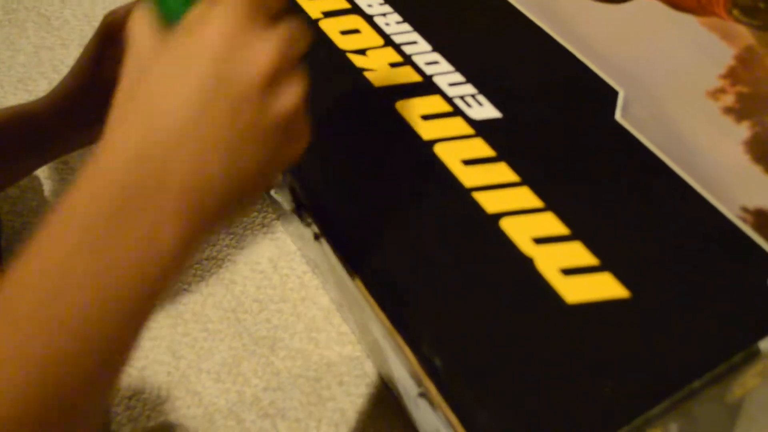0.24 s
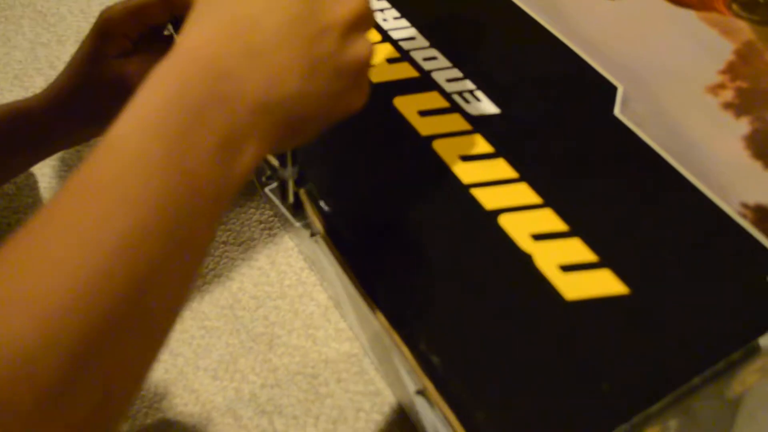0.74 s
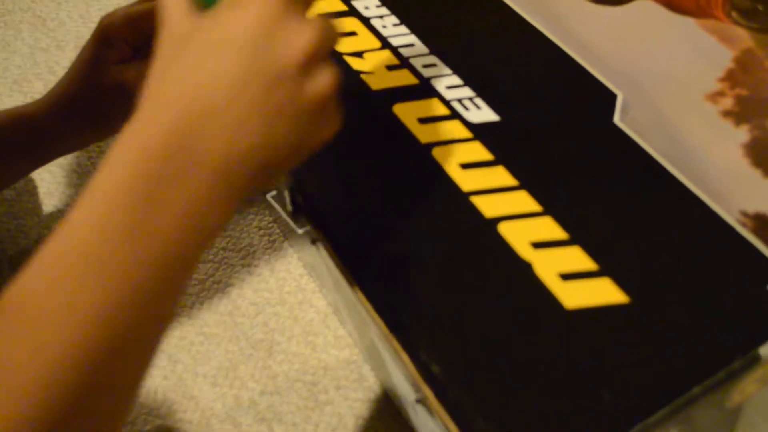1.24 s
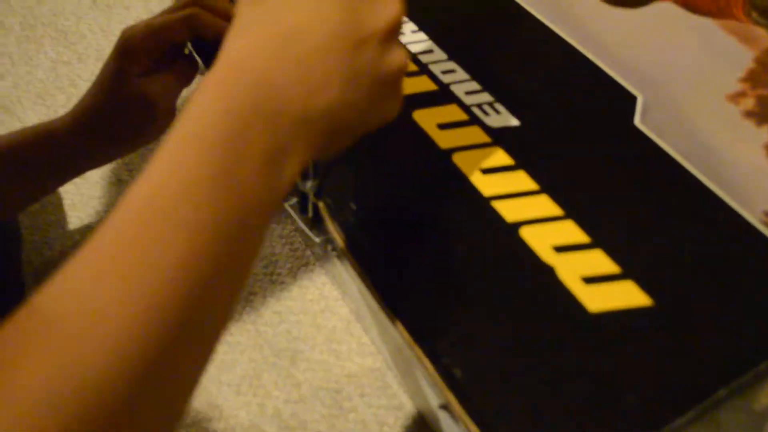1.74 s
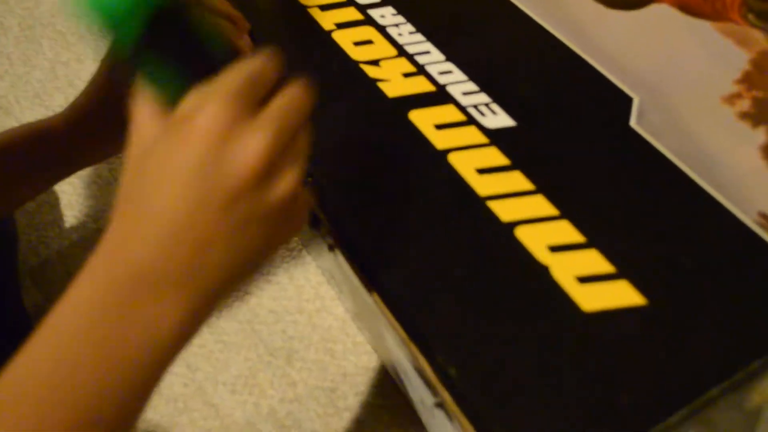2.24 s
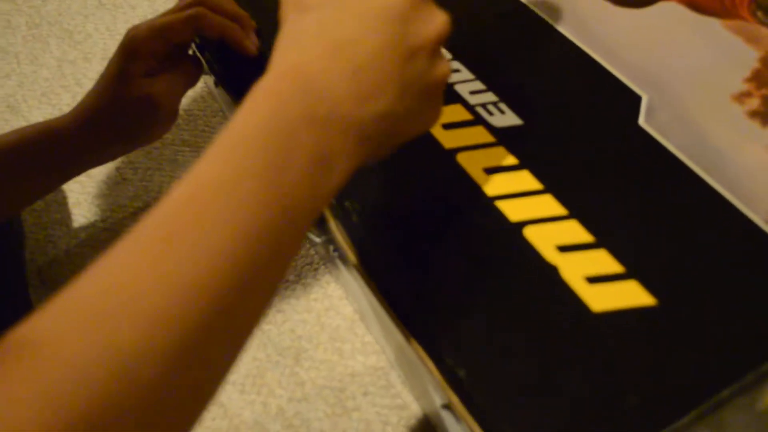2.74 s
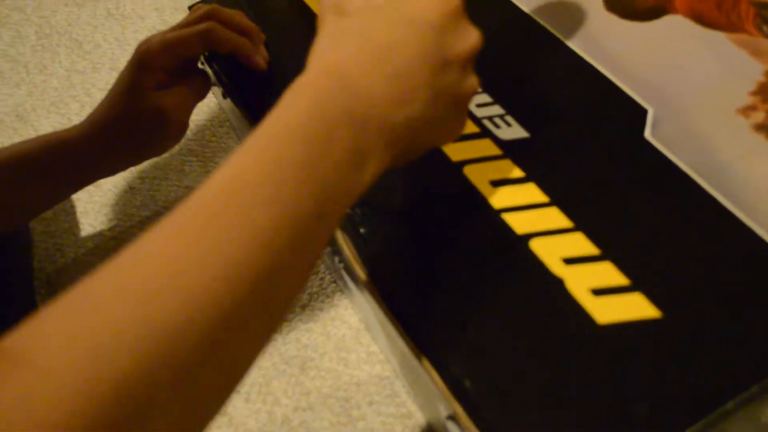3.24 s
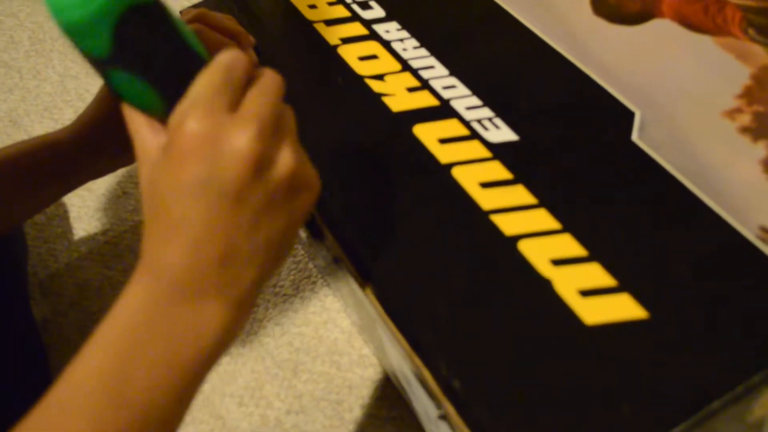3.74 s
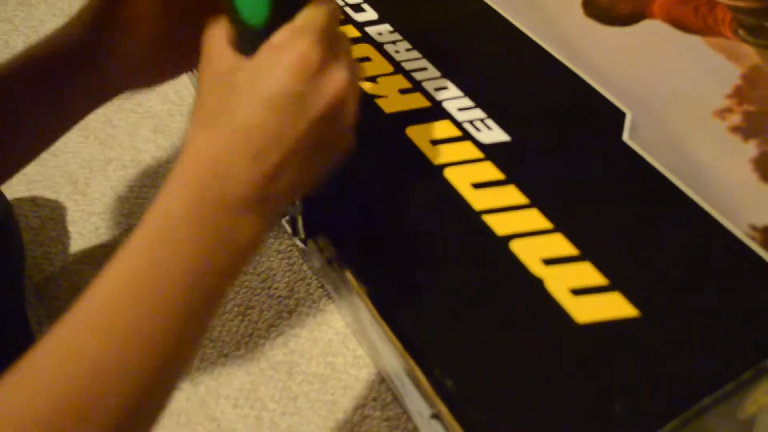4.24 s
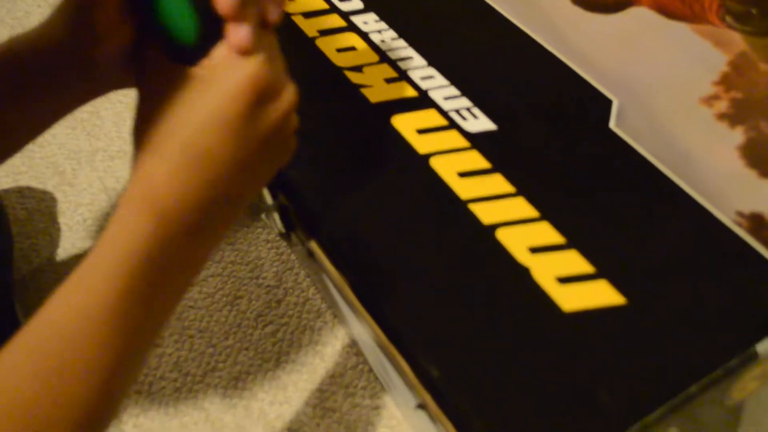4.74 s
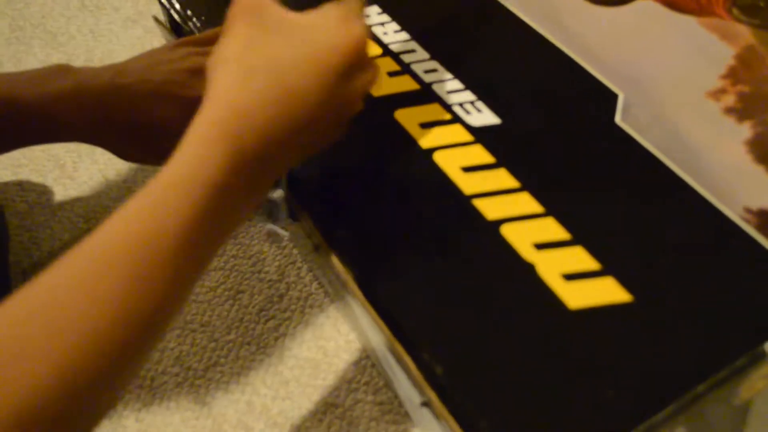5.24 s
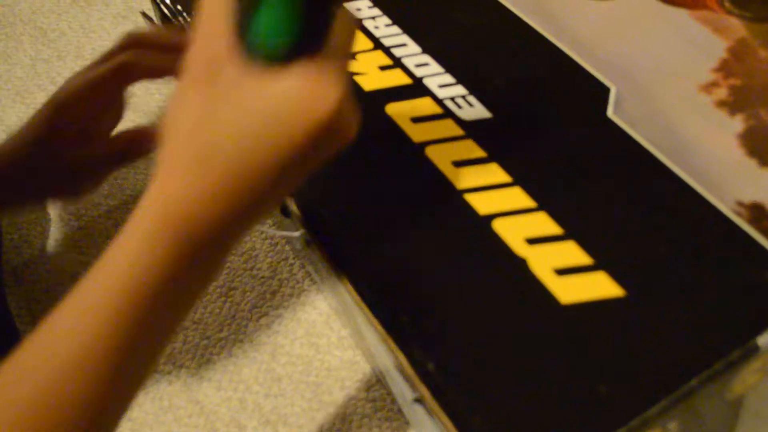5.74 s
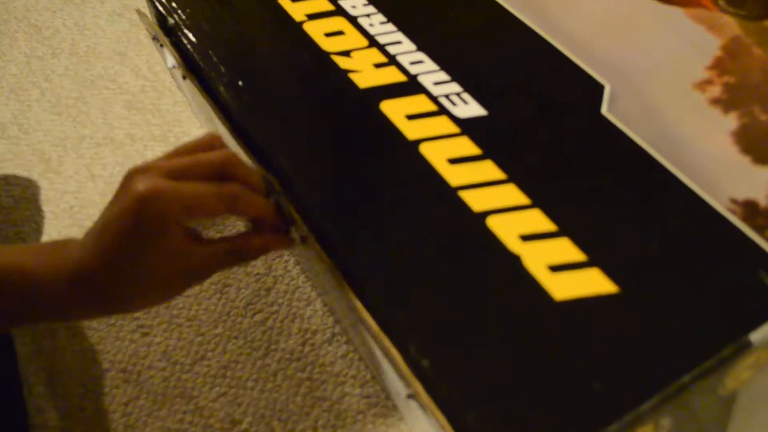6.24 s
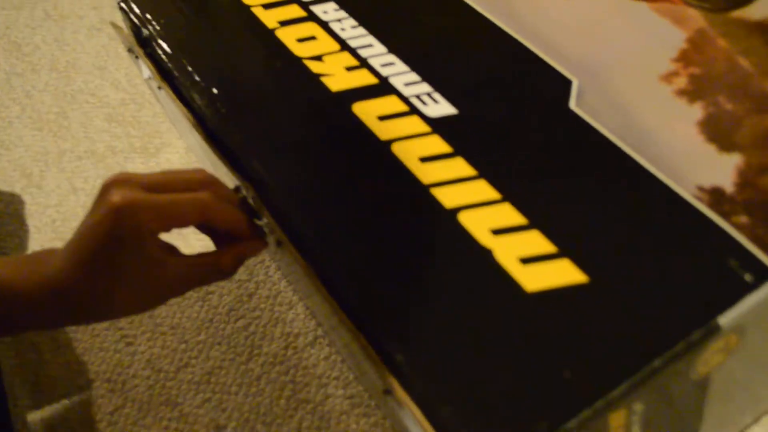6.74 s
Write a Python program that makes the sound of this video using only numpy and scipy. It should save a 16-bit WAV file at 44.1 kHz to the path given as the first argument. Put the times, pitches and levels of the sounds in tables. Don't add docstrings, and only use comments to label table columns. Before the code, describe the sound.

A screwdriver works at metal staples in a hollow cardboard box, faint scrapes and knocks building to a loud pop and a bright metallic snap.

```python
import sys
import numpy as np
from scipy import signal
from scipy.fft import rfft, irfft, next_fast_len
from scipy.io import wavfile
from scipy.ndimage import uniform_filter1d

SR = 44100
rng = np.random.default_rng(int(sys.argv[2]) if len(sys.argv) > 2 else 0)


def output_pcm(signal):
    pcm = np.clip(np.atleast_2d(signal).T, -1, 1) * 32767
    wavfile.write(sys.argv[1], SR, np.round(pcm).astype(np.int16))


def volts_from_decibels(level):
    exponent = np.asarray(level, float) / 20
    return 10 ** exponent


N = 307818

# start_s, wall_peak_db, panel_db (re wall), wall_ring_factor, loudest_wall_hz
FIRM_KNOCKS = [(0.3191, -29, 1, 1.8, 1150), (0.457, -40, -2, 1.1, 1340), (1.1106, -45, -3, 1, 1460),
               (1.6776, -37, -14, 1.8, 840), (1.934, -40, 1.5, 1.1, 1180), (1.9598, -33, 5, 1.4, 1090),
               (1.9848, -37.5, 9, 3.2, 1230), (2.1758, -39.5, 0.5, 1.1, 1310), (2.2207, -39.5, 8, 2.7, 933),
               (3.4653, -42.5, 8, 2.2, 700), (3.5679, -39, 6.5, 1.3, 1090), (3.827, -33.5, 0.5, 2.2, 1450),
               (3.9068, -42.5, 0.5, 1.4, 1160), (5.0496, -39, 7, 2.4, 800), (5.064, -32, 9.5, 1.1, 900),
               (5.075, -26.5, 5, 0.75, 900), (5.268, -41, -16.5, 1.1, 939), (5.2757, -30, -6, 1, 1044),
               (5.2965, -25, -6, 1.1, 1280), (5.6219, -30.5, 2, 1.7, 1800), (5.6286, -30.5, 3.5, 1.2, 2000),
               (6.6156, -41, -6.5, 1.5, 1030), (6.94, -33, 2, 1.2, 1280)]
# pitch_hz, level_db, t60_s
PANEL_MODES = [(159.4, -5, 0.1), (185.8, -6, 0.17), (204, 0.5, 0.14), (251.4, -2, 0.081), (273.4, 5, 0.073),
               (335, 4.5, 0.055), (410, -4.5, 0.13), (504, -9.5, 0.052)]
# pitch_hz, level_db, t60_s
WALL_MODES = [(537, 0, 0.049), (634, -2, 0.04), (751, -6, 0.046), (849, -9, 0.071), (891, 3.5, 0.018),
              (1041, -5, 0.053), (1160, -1.5, 0.022), (1336, -2, 0.023), (1550, 2, 0.017),
              (1730, -5, 0.033), (1855, -7, 0.031), (1965, -9, 0.043), (2198, -9.5, 0.026)]
# pitch_hz, level_db, t60_s
BLADE_MODES = [(2900, -2, 0.0017), (3200, -7, 0.0077), (3700, -9.5, 0.0057), (4000, -18.5, 0.005)]
# frequency_hz, level_db (per Hz)
BOARD_HISS = [(2500, 10.5), (3300, 5.5), (5000, -0.5), (6500, -4), (8500, -4), (11000, -9), (14000, -19),
              (16000, -24)]


def rms_one(x):
    return x / np.sqrt(np.mean(x ** 2) + 1e-20)


def coloured(x, spectrum):
    hz, db = np.transpose(spectrum)
    bins_hz = np.maximum(np.arange(N // 2 + 1) * SR / N, 1)
    gain = volts_from_decibels(np.interp(np.log(bins_hz), np.log(hz), db))
    return rms_one(irfft(rfft(x) * gain, N))


def top_cut(x, hz):
    return signal.sosfilt(signal.cheby2(12, 60, hz, fs=SR, output="sos"), x)


def bass_cut(x, order, hz):
    return signal.sosfilt(signal.butter(order, hz, "high", fs=SR, output="sos"), x)


def band_burst(shape, low_hz, high_hz):
    band = signal.butter(2, [low_hz, high_hz], "band", fs=SR, output="sos")
    burst = signal.sosfilt(band, rng.standard_normal(len(shape)) * shape)
    return burst / np.max(np.abs(burst))


def add(out, s, sound):
    at = max(round(s * SR), 0)
    out[at:at + len(sound)] += sound[:N - at]


def grit(per_s, spread_db, size):
    sizes = volts_from_decibels(spread_db * np.minimum(rng.exponential(1, size), 4)) * rng.choice([-1, 1], size)
    return sizes * (rng.random(size) < per_s / SR) + 1e-9


def near(modes, centre_hz, fall_db):
    return [(hz, db - fall_db * abs(np.log2(hz / centre_hz)), t60) for hz, db, t60 in modes]


def ring(force, envelope, modes):
    out = 0
    for k, (hz, db, t60) in enumerate(modes):
        r, w = volts_from_decibels(-60 / (t60 * SR)), 2 * np.pi * hz / SR
        resonance = [0, np.sin(w)], [1, -2 * r * np.cos(w), r * r]
        both = signal.lfilter(*resonance, [force, force * envelope])
        out = out + (-1) ** k * volts_from_decibels(db) * both
    steady, shaped = out
    return shaped / np.sqrt(np.mean(steady ** 2))


def struck(modes, stretch, spread_db, size, signs=(-1, 1)):
    hz, db, t60 = np.transpose(modes)[:, :, None]
    t = np.arange(size) / SR
    strength = volts_from_decibels(db + spread_db * rng.standard_normal(hz.shape)) * rng.choice(signs, hz.shape)
    decay = volts_from_decibels(-60 * t / (t60 * stretch))
    out = np.sum(strength * np.sin(2 * np.pi * hz * t) * decay, axis=0)
    return out / np.max(np.abs(out))


def hush():
    # frequency_hz, level_db (per Hz)
    hush_spectrum = [(19, -30), (45, -11), (213, -13.5), (700, -10.5), (1560, -14.5), (2980, -23),
                     (5680, -36), (16000, -40.5)]
    return volts_from_decibels(-65.5) * coloured(rng.standard_normal(N), hush_spectrum)


def room(x):
    t60_s, wall_cut_hz = 0.26, 2750
    size = next_fast_len(N + SR)
    angle = -2j * np.pi * np.arange(size // 2 + 1) / size
    dull = np.exp(-2 * np.pi * wall_cut_hz / SR)
    absorption = (1 - dull) / (1 - dull * np.exp(angle))
    echo = 0
    for k, lag in enumerate((rng.uniform(0.0055, 0.04, 10) * SR).astype(int)):
        loop = volts_from_decibels(-60 * lag / SR / t60_s) * absorption * np.exp(angle * lag)
        echo = echo + (-1) ** k * loop / (1 - loop)
    return irfft(rfft(x, size) * echo, size)[:N]


def boom():
    # peak_s (the hold begins), level_db, hold_s
    pushes = [(0.0, -80, 0.0035), (0.29, -61, 0.068), (0.607, -61.5, 0.027), (0.933, -65.5, 0.028),
              (1.3, -61, 0.017), (2.004, -56, 0.0089), (2.227, -52.5, .01), (2.384, -59, 0.035),
              (3.493, -59, 0.082), (3.848, -48.5, 0.0092), (4.05, -55, 0.015), (4.19, -61, 0.018),
              (4.31, -63, 0.035), (4.605, -63, 0.031), (4.887, -62.5, 0.077), (5.086, -46.5, 0.0044),
              (5.272, -39, 0.035), (5.66, -53, 0.028), (6.53, -69.5, 0.043), (6.757, -73, 0.081),
              (6.945, -66, .03)]
    pitch_hz, wander_hz = 108, 3.01
    rise_db_per_s, fall_db_per_s = 336, 233
    t, level = np.arange(N) / SR, 0
    for s, db, hold in pushes:
        before_db = rise_db_per_s * np.maximum(s - t, 0)
        after_db = fall_db_per_s * np.maximum(t - s - hold, 0)
        level = level + volts_from_decibels(db - before_db - after_db)
    flex = uniform_filter1d(rng.standard_normal(N), size=4000)
    flex = rms_one(uniform_filter1d(flex, size=4000))
    phase = 2 * np.pi * np.cumsum(pitch_hz + wander_hz * flex) / SR
    return level * np.sqrt(2) * np.sin(phase)


def rubbing():
    # time_s, pressure_db (re a resting hand)
    hand_pressure = [(0.0, -2), (0.31, -10), (0.43, 9), (0.66, -4), (1.44, -2.5), (2.1, 6.5), (2.74, -13.5),
                     (3.42, -9), (3.62, -4), (4.39, 11.5), (4.86, -1.5), (5.23, 13), (5.33, 10), (5.89, -2),
                     (6.57, 7), (6.98, 0)]
    press_db = np.interp(np.arange(N) / SR, *np.transpose(hand_pressure))
    rumble = ring(grit(450, 6.8, size=N), volts_from_decibels(-69.5 + press_db), PANEL_MODES)
    rasp = ring(grit(1150, 3.1, size=N), volts_from_decibels(-70.5 + 0.61 * press_db), WALL_MODES)
    rustle = volts_from_decibels(-73 + 0.23 * press_db) * coloured(grit(7000, 3.0, size=N), BOARD_HISS)
    return rumble + rasp + rustle


def brushes():
    # start_s, length_s, level_db
    finger_strokes = [(0.56, .07, -79), (2.96, .07, -82), (3.729, .06, -80), (3.99, .06, -76),
                      (4.108, 0.087, -73.5), (4.27, .07, -79), (4.85, .04, -79), (4.885, .06, -75),
                      (5.058, 0.046, -72), (5.596, 0.021, -64), (6.268, 0.068, -73.5)]
    # frequency_hz, level_db (per Hz)
    gloss_spectrum = [(3000, -23), (6000, -3), (8500, -2.5), (12000, -3), (15000, -10), (16500, -16)]
    swell = np.zeros(N)
    for s, length, db in finger_strokes:
        add(swell, s, volts_from_decibels(db) * np.sqrt(np.hanning(round(length * SR))))
    return swell * coloured(grit(5200, 4.4, size=N), gloss_spectrum)


def puffs():
    # start_s, peak_db, length_s
    lid_jumps = [
        (5.072, -44, .01),
        (5.0655, -32, 0.0024),
        (5.244, -20.5, 0.0031),
    ]
    out = np.zeros(N)
    for s, db, length in lid_jumps:
        add(out, s, volts_from_decibels(db) * np.hanning(round(length * SR)))
    return out


def short_rings():
    # start_s, length_s, level_db, pitch_hz
    rough_notes = [(0.26, 0.039, -55, 1530), (2.227, .045, -80, 4600), (3.5, .05, -72, 2200),
                   (3.97, 0.075, -74, 3250), (5.207, .042, -64, 3500), (5.222, 0.027, -58, 2000),
                   (5.249, 0.014, -31, 820), (3.734, 0.045, -70, 1500), (4.1, 0.027, -58, 1030),
                   (3.7, 0.044, -71, 1900), (3.407, 0.031, -47.5, 1050), (5.672, 0.014, -54, 6700),
                   (0.253, 0.027, -62, 1440), (0.272, 0.023, -61, 1700), (1.885, 0.037, -60.5, 1900),
                   (1.8, 0.027, -55, 800), (1.282, 0.032, -62, 170), (3.98, 0.053, -56, 300),
                   (3.9, .04, -68.5, 2320), (5.63, .03, -58, 1950), (6.43, 0.039, -61, 330)]
    out = np.zeros(N)
    for s, length, db, hz in rough_notes:
        swell = np.sin(np.pi * np.clip(np.arange(SR // 10) / SR / length, 0, 1))
        add(out, s, volts_from_decibels(db) * ring(grit(2500, 2.8, size=len(swell)), swell, [(hz, 0, .009)]))
    return out


def hums():
    # start_s, length_s, level_db, pitch_hz
    lone_hums = [(0.264, .045, -51, 1610), (0.275, .02, -50, 1820), (0.255, .02, -56, 1370),
                 (0.26, 0.042, -54, 373), (0.33, .04, -46, 204), (0.45, .035, -54, 205),
                 (0.447, 0.053, -58, 368), (1.21, 0.036, -62, 171), (1.499, 0.048, -67, 310),
                 (1.603, 0.11, -63.5, 320), (3.74, 0.033, -64, 1620), (3.835, .045, -66, 2380),
                 (3.839, 0.042, -51, 190), (3.972, 0.063, -68, 3150), (3.97, .03, -67, 1950),
                 (3.972, .05, -50, 995), (3.97, .085, -44, 215), (4.021, .04, -55, 720),
                 (5.256, .027, -33, 925), (5.252, .014, -38, 1560), (3.975, .055, -47, 550),
                 (3.97, .045, -49, 730), (5.262, 0.032, -34, 166), (5.285, 0.016, -34, 420),
                 (5.296, 0.021, -35, 200), (5.304, .03, -40, 335), (5.319, .04, -44, 187),
                 (5.587, .028, -70, 9200), (5.636, .03, -66, 8800), (5.67, .02, -58, 9500),
                 (6.448, 0.057, -60, 260)]
    evenness = .8
    out, t = np.zeros(N), np.arange(6144) / SR
    for s, length, db, hz in lone_hums:
        t60_s = np.clip(40.0 / hz, .004, .05)
        mode = [(hz, 0, t60_s)]
        note = ring(grit(2500, 2.5, size=2 * len(t)), 1, mode)
        note = note / (np.abs(signal.hilbert(note)) + .2) ** evenness
        note = note[len(t):]
        swell = np.sqrt(np.abs(np.sin(np.pi * np.clip(t / length, 0, 1)))) * (t < length)
        add(out, s, volts_from_decibels(db) * ring(note, swell, mode))
    return out


def thuds():
    # start_s, peak_db, pitch_hz, t60_s
    panel_thuds = [
        (1.2815, -47, 190, .07),
        (1.11, -51, 680, 0.044),
        (1.6785, -45, 346, .05),
        (1.679, -50, 840, .06),
        (5.2457, -12, 1450, .009),
        (3.8275, -46, 600, .04),
        (0.58, -56, 620, .04),
        (5.6285, -30, 264, 0.035),
        (6.1466, -53, 290, .05),
    ]
    out, t = np.zeros(N), np.arange(6144) / SR
    for s, db, hz, t60 in panel_thuds:
        add(out, s, volts_from_decibels(db - 60 * t / min(t60, .09)) * np.sin(2 * np.pi * hz * t))
    return out


def flicks():
    # start_s, peak_db, centre_hz
    wire_flicks = [(5.7805, -56, 6500), (5.7905, -49.5, 6000), (5.802, -62, 5500), (5.705, -55, 7700),
                   (5.6, -58, 9500), (3.8285, -51, 10000), (4.024, -60, 4100), (5.6735, -46, 9500),
                   (5.2445, -26, 2400), (5.2445, -34, 4600), (5.297, -38, 2100), (5.318, -44, 1500),
                   (5.644, -46, 8500), (3.8285, -48, 4100), (5.6205, -28, 9000)]
    out, t = np.zeros(N), np.arange(6144) / SR
    for s, db, hz in wire_flicks:
        add(out, s, volts_from_decibels(db) * band_burst(t * np.exp(-t / 0.00073), hz / 1.33, hz * 1.23))
    return out


def nicks():
    # start_s, peak_db, centre_hz
    card_nicks = [(0.319, -53.5, 3300), (1.0495, -53, 3200), (1.9594, -54, 4400), (3.0283, -57, 2500),
                  (3.5673, -57, 4200), (3.828, -44, 2200), (3.8292, -50, 4200), (3.9075, -63, 4400),
                  (4.3545, -53, 2400), (4.8309, -60, 2800), (4.9916, -56, 3000), (5.0617, -44, 2300),
                  (5.0622, -55, 5400), (5.066, -36, 2700), (5.0755, -31.5, 1600), (5.0757, -44, 3100),
                  (5.084, -42, 1600), (5.2662, -35, 2300), (5.267, -36, 4700), (5.2766, -28, 2200),
                  (5.2766, -36, 4500), (5.288, -35.5, 2200), (5.2965, -41, 4900), (5.301, -52, 7600),
                  (5.644, -37, 1900), (5.6725, -44, 6500), (5.682, -42, 3300), (5.419, -61, 2800),
                  (5.6216, -37, 12000), (5.6217, -26.5, 3300), (5.2453, -19, 1440), (3.8287, -49, 3600),
                  (1.1084, -59, 3000), (5.5735, -50, 1700), (6.8165, -52.5, 5500), (5.058, -39, 705),
                  (0.27, -52, 1700), (3.9764, -59, 3150), (5.815, -41, 2200), (5.2455, -26.5, 3250)]
    length_s, half_band = 0.00093, 2. ** 0.25
    out, t = np.zeros(N), np.arange(SR // 80) / SR
    for s, db, hz in card_nicks:
        add(out, s, volts_from_decibels(db) * band_burst(t * np.exp(-2 * t / length_s), hz / half_band, hz * half_band))
    return out


def slips():
    # start_s, length_s, wall_db, panel_db, hiss_db
    flat_slips = [(0.437, 0.038, -66, -55, -101), (0.533, 0.043, -65, -55.5, -101),
                  (0.573, 0.064, -72, -69, -91), (2.223, 0.044, -74, -73, -83), (3.4, 0.031, -48, -50, -90),
                  (3.482, 0.069, -61.5, -62, -85), (3.729, 0.051, -62, -68, -80),
                  (3.85, 0.052, -61.5, -55, -84), (3.97, 0.06, -48, -47, -87),
                  (4.036, 0.022, -60, -55.5, -86), (4.129, 0.039, -87, -75, -79),
                  (4.275, 0.057, -61.5, -55, -82), (4.548, 0.043, -53.5, -73, -84),
                  (4.625, 0.02, -51, -65, -86), (4.835, 0.079, -67, -65, -84),
                  (5.106, 0.028, -62, -52, -99.5), (5.18, 0.12, -52, -75, -78),
                  (5.219, 0.029, -47, -44, -74), (5.249, 0.04, -37, -37, -78), (5.28, 0.025, -42, -40, -62),
                  (5.314, 0.035, -49.5, -47.5, -72), (5.346, 0.044, -56.5, -57, -81),
                  (6.45, 0.11, -76, -67, -100), (6.703, 0.03, -61, -70, -79.5)]
    # start_s, length_s, wall_db, panel_db, hiss_db
    tip_scrapes = [(0.25, 0.041, -56, -55, -81), (0.947, 0.056, -66.5, -56.5, -100),
                   (1.883, 0.066, -63, -57, -86), (4.906, 0.11, -70, -61, -85),
                   (5.578, 0.031, -56.5, -44, -72), (5.624, 0.042, -59, -56, -65),
                   (5.669, 0.018, -71, -63, -59), (5.69, 0.037, -63, -76, -77),
                   (5.785, 0.067, -66, -92, -76), (6.27, 0.05, -62.5, -68, -82),
                   (3.393, 0.039, -49, -66, -90), (3.44, 0.031, -61, -63, -86),
                   (5.078, 0.03, -54, -60, -75), (5.182, 0.14, -53, -72, -76)]
    strokes = [(*row, 820, 0.16, 0.26) for row in flat_slips]
    strokes += [(*row, 1260, 0.36, 0.52) for row in tip_scrapes]
    for s, db, panel_db, _, hz in FIRM_KNOCKS:
        strokes.append((s + 0.00485, 0.025, db - 26, db + panel_db - 24, db - 61, hz, 0.014, 0.32))
    out, hiss = np.zeros(N), np.zeros(N)
    for s, length, wall_db, panel_db, hiss_db, wall_hz, rise, release in strokes:
        u = np.arange(SR // 7) / (max(length, .01) * SR)
        shape = np.clip(u / rise, 0, 1) * np.exp(-np.maximum(u - .85, 0) / release)
        wall = ring(grit(1800, 2.9, size=len(u)), shape, near(WALL_MODES, wall_hz, 10.5))
        panels = ring(grit(700, 5.3, size=len(u)), shape, PANEL_MODES)
        shaft = ring(grit(1600, 2.3, size=len(u)), shape, BLADE_MODES)
        add(out, s, volts_from_decibels(wall_db) * wall)
        add(out, s, volts_from_decibels(panel_db) * panels)
        add(out, s, volts_from_decibels(wall_db - 40) * shaft)
        add(hiss, s, volts_from_decibels(hiss_db + 12.5) * shape)
    return out + hiss * coloured(grit(12000, 5.0, size=N), BOARD_HISS)


def ticks():
    # start_s, peak_db, centre_hz, blade_db (re tick)
    staple_ticks = [(0.319, -63, 6130, 13), (0.5758, -57, 11600, -10), (1.0478, -54.5, 5600, -6),
                    (1.11, -61, 6810, 4), (1.909, -58, 5120, -5), (1.933, -58, 5590, 6),
                    (1.959, -60, 5600, -15), (2.2186, -54, 5600, 0), (2.229, -58, 6492, -13),
                    (3.055, -60, 7400, -12), (3.414, -55, 5200, -27), (3.8284, -60, 9000, -8),
                    (4.0261, -53.5, 8800, -6), (4.1744, -60, 5200, -14), (4.355, -72, 5560, 14),
                    (4.5544, -63, 5400, 0), (4.6167, -64, 5400, 0), (5.066, -51, 6500, 0),
                    (5.076, -45.5, 5020, 7), (5.245, -25.5, 7800, 2), (5.2668, -25.5, 8240, -1.5),
                    (5.2764, -43, 5270, 1), (5.296, -38, 7330, -1), (5.5736, -60, 10000, -5),
                    (5.6207, -32, 10500, -14), (5.672, -44, 9800, -12), (5.7897, -55, 6290, 3),
                    (6.616, -61, 7400, 11), (6.816, -49, 5380, -4), (6.8473, -57, 5160, -16)]
    # start_s, peak_db, centre_hz
    wire_creaks = [(0.042, -60, 11900), (0.3524, -61, 9190), (0.3605, -57, 9040), (0.6373, -59, 8170),
                   (0.7213, -62, 7440), (0.748, -60, 8460), (1.286, -55.5, 10500), (1.469, -60, 11900),
                   (1.7165, -61, 5590), (2.504, -63, 8450), (2.5616, -62, 6300), (2.611, -56, 11800),
                   (2.631, -56, 8200), (2.6638, -61, 7170), (2.6804, -59, 7500), (2.7925, -60, 8170),
                   (2.8325, -64, 12800), (2.9018, -60, 8670), (2.928, -59, 8300), (2.9502, -63, 8790),
                   (2.9874, -62, 8380), (3.0135, -59, 10000), (3.038, -61, 7680), (3.1752, -63, 7520),
                   (3.238, -63, 8730), (4.8533, -62, 7200), (4.9446, -53, 11100), (5.1606, -55.5, 6900),
                   (5.7044, -63, 8680), (5.78, -63, 6900)]
    # pitch_hz, level_db, t60_s
    staple_modes = [(5000, 0.5, 0.0026), (6300, -2, 0.0046), (7200, -7, 0.0085), (7940, -3, 0.006),
                    (8840, -8.5, 0.012), (9360, -7, .007), (10370, -0.5, 0.0062), (11600, 2, 0.0058),
                    (12600, 1, 0.0046), (13700, -11, .005)]
    out = np.zeros(N)
    size = SR // 40
    contact = 1 - np.exp(-np.arange(size) / SR / 0.00025)
    crack_band = signal.butter(2, [5600, 11000], "band", fs=SR, output="sos")
    crack_decay = np.exp(-np.arange(400) / SR / 0.00087)
    creaks = [(*creak, -16) for creak in wire_creaks]
    for s, peak_db, hz, blade_db in [*staple_ticks, *creaks]:
        wire = contact * struck(near(staple_modes, hz, 11.0), 1.0, spread_db=2, size=size)
        shaft = contact * struck(BLADE_MODES, 0.96, spread_db=-1.0, size=size)
        crack = crack_decay * signal.sosfilt(crack_band, rng.standard_normal(400))
        add(out, s, volts_from_decibels(peak_db + 2) * wire)
        add(out, s, volts_from_decibels(peak_db + blade_db) * shaft)
        add(out, s, volts_from_decibels(peak_db - 1) * crack)
    return out


def knocks():
    # start_s, peak_db
    lid_thumps = [(0.002, -49.5), (0.4122, -46.5), (0.4261, -44.5), (1.2828, -57), (2.1888, -45.5),
                  (2.3746, -52.5), (3.7335, -50), (3.7771, -51), (4.0444, -46), (4.1526, -59), (4.187, -53),
                  (4.8301, -49), (4.8553, -51.5), (4.944, -55), (5.6755, -35), (6.1466, -45), (6.4748, -54)]
    # start_s, peak_db
    edge_chatters = [
        (0.395, -45),
        (4.3536, -56),
        (4.5544, -35.5),
        (4.5637, -36.5),
        (4.5782, -52),
        (4.5983, -41),
        (4.6158, -36.5),
        (4.6301, -40.5),
        (5.1827, -41.5),
        (6.504, -49),
    ]
    # start_s, peak_db
    tip_taps = [
        (1.3735, -58),
        (5.7891, -43),
        (5.8008, -46),
        (5.8147, -41.5),
        (5.8226, -44),
        (6.8177, -47.5),
        (6.8466, -47.5),
    ]
    # panel dB re wall, wall ring factor, loudest wall Hz
    light = [(s, db, 6.5, 0.92, 310) for s, db in lid_thumps]
    light += [(s, db, 0.33, 0.99, 430) for s, db in edge_chatters]
    light += [(s, db, -65, 0.99, 3000) for s, db in tip_taps]
    out, t = np.zeros(N), np.arange(SR // 8) / SR
    wall_swell, panel_swell = 1 - np.exp(-t / 0.00045), 1 - np.exp(-t / 0.0015)
    for s, wall_db, panel_db, stretch, wall_hz in [*FIRM_KNOCKS, *light]:
        wall_ring = .5 * np.clip(stretch, .3, 2.5)
        wall = wall_swell * struck(near(WALL_MODES, wall_hz, 4.5), wall_ring, spread_db=-0.5, size=len(t))
        panels = panel_swell * struck(near(PANEL_MODES, 234, 2.7), 0.6, spread_db=2.0, size=len(t))
        add(out, s, volts_from_decibels(wall_db + 1.5) * wall + volts_from_decibels(wall_db + panel_db) * panels)
    return out


def snap():
    # pitch_hz, level_db, t60_s
    snap_modes = [(279, -4.5, 0.061), (1110, -5.5, 0.022), (1600, -6, 0.015), (2160, -1.5, .01),
                  (3200, -2, 0.011), (4050, -18, 0.0089), (7240, -10, 0.0076), (8200, 1, 0.0071),
                  (8800, 2, 0.0066), (9680, 1, 0.0068), (11100, -2, 0.0058), (11500, -6, 0.0059),
                  (13000, -10, .004), (14400, -7, .004)]
    out, t = np.zeros(N), np.arange(SR // 8) / SR
    blow = struck(snap_modes, 1, 0, size=len(t), signs=[1]) * (1 - np.exp(-t / 0.00038))
    add(out, 5.6209, volts_from_decibels(-4.5) * blow)
    return out


def pop():
    # pitch_hz, level_db, t60_s
    flap_modes = [(219, -7, 0.077), (275, 2, 0.0383), (410, -25, 0.024), (1110, -38, 0.017),
                  (625, -2, 0.035), (910, -0.5, 0.04), (1450, -2, 0.013), (1900, -16, 0.01)]
    out, t = np.zeros(N), np.arange(SR // 8) / SR
    blow = struck(flap_modes, 0.97, 0, size=len(t), signs=[1]) * (1 - np.exp(-t / 0.00054))
    add(out, 5.2442, volts_from_decibels(-0.15) * blow)
    return out


def scene():
    soft_cut_hz, room_db = 16550, -20
    soft = boom() + rubbing() + brushes() + slips()
    sharp = nicks() + ticks() + knocks() + snap() + pop()
    box = sharp + top_cut(soft + volts_from_decibels(room_db) * room(soft + sharp), soft_cut_hz)
    box = puffs() + bass_cut(box, 3, 70)
    lone_notes = bass_cut(hums() + thuds() + flicks(), 2, 80)
    return (box + short_rings() + lone_notes + top_cut(hush(), soft_cut_hz))[None]


def band_limit(x):
    return signal.sosfilt(signal.butter(12, 16600, fs=SR, output="sos"), x)


def record(dry):
    mix = top_cut(dry, 17100) + .0006
    return band_limit(mix)


dry = scene()
out = record(dry)
output_pcm(out)
```